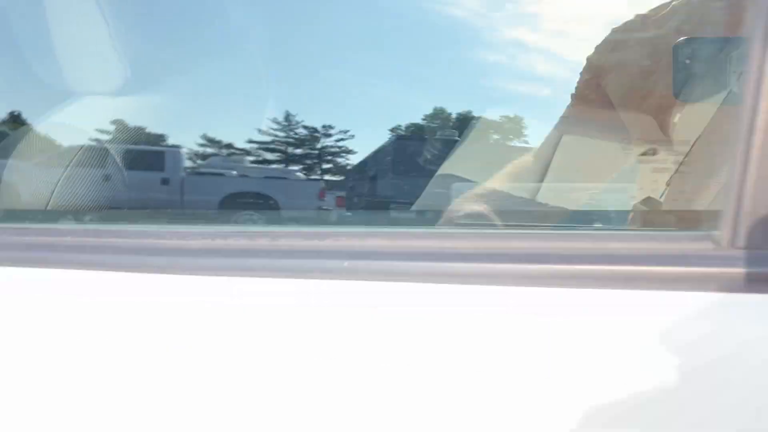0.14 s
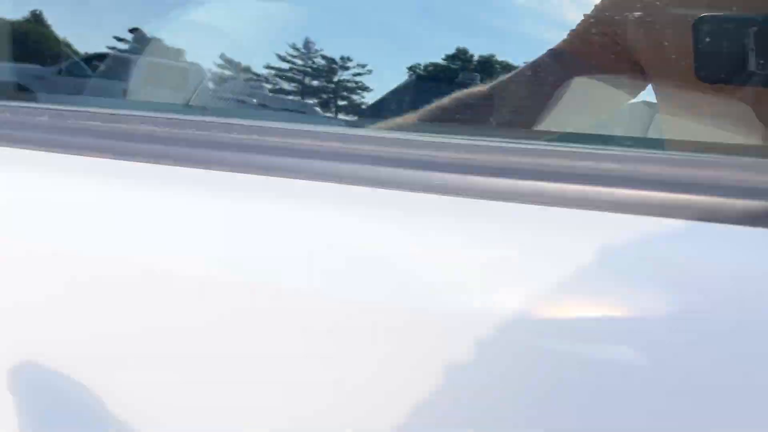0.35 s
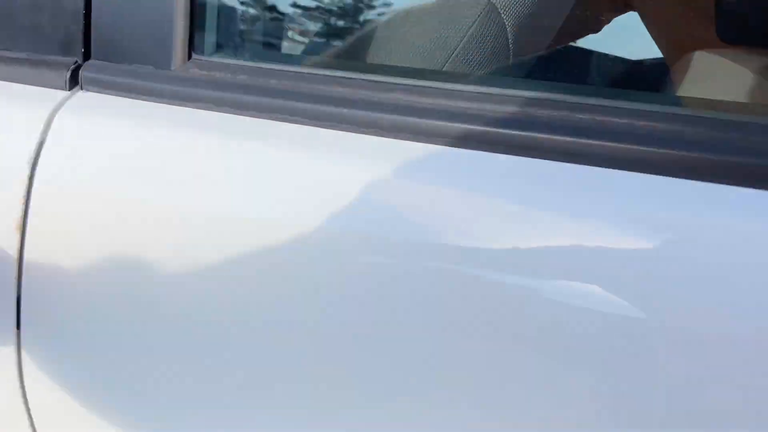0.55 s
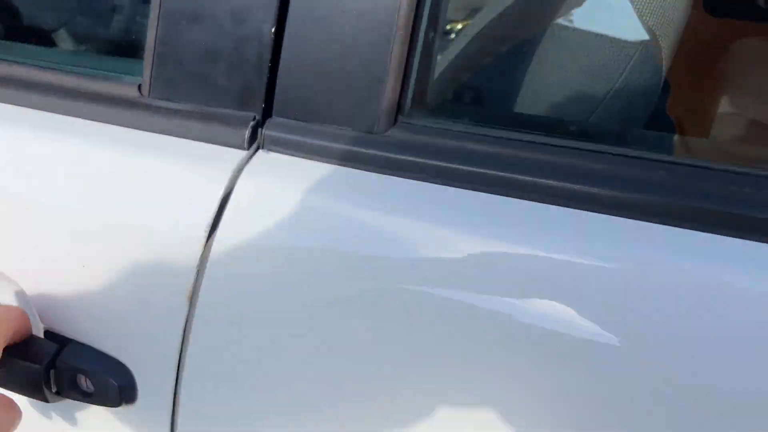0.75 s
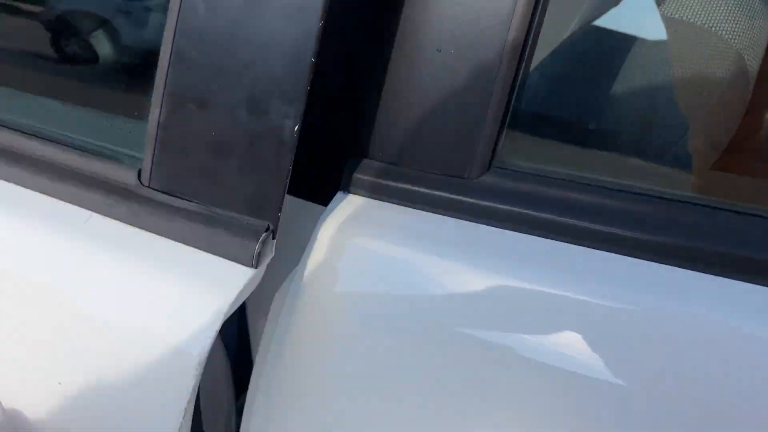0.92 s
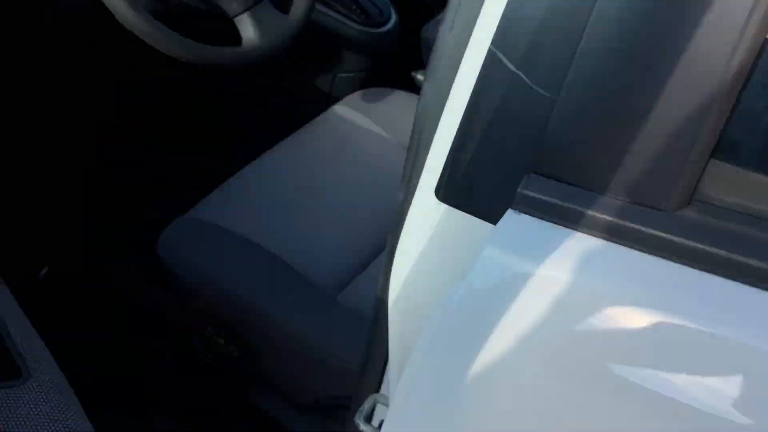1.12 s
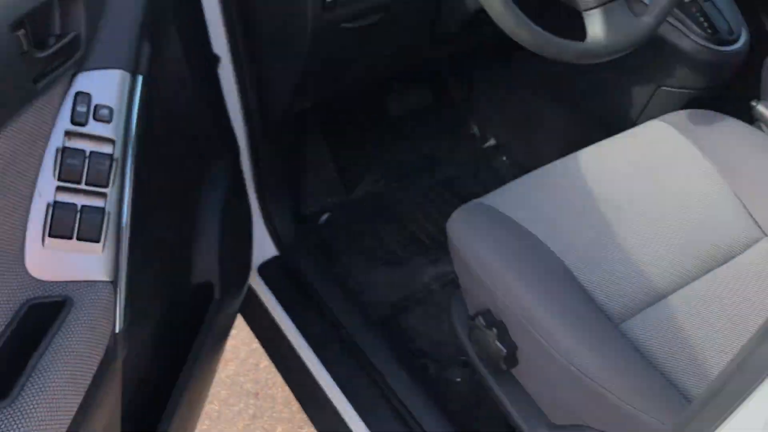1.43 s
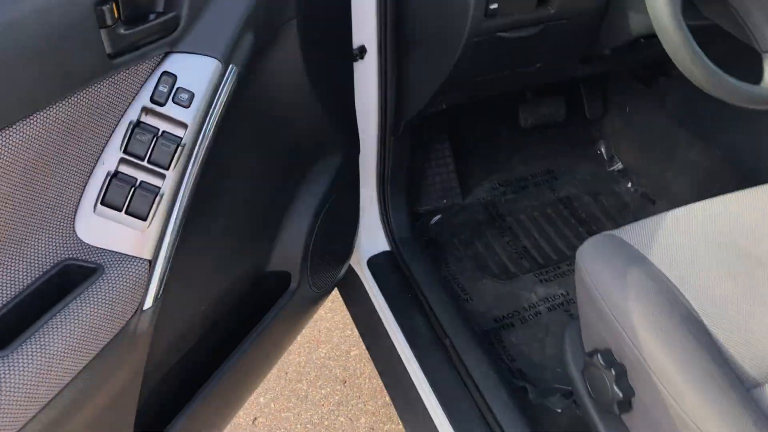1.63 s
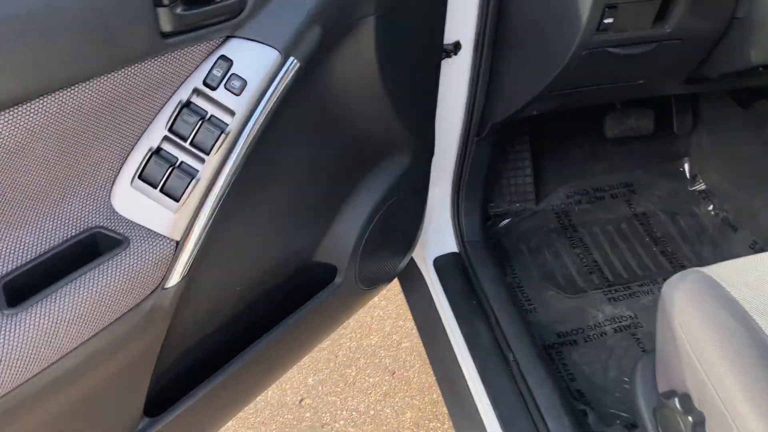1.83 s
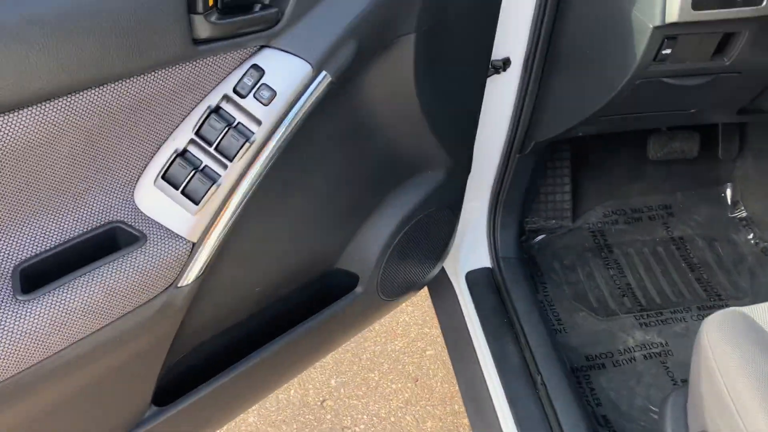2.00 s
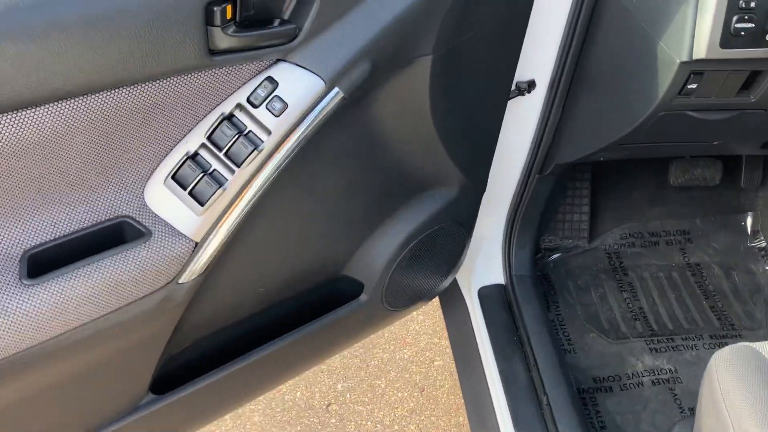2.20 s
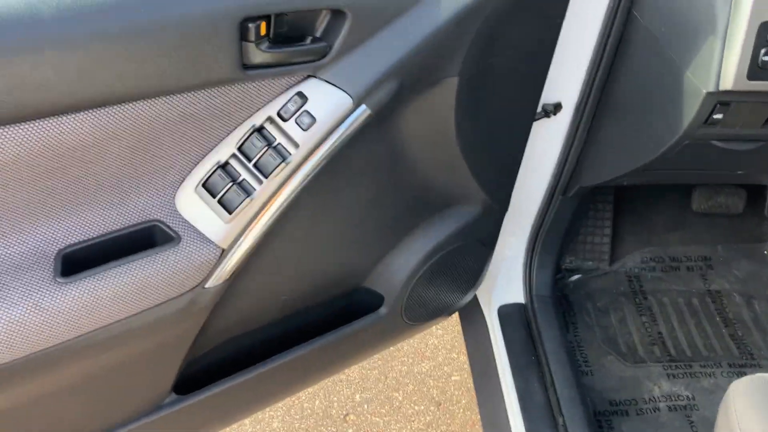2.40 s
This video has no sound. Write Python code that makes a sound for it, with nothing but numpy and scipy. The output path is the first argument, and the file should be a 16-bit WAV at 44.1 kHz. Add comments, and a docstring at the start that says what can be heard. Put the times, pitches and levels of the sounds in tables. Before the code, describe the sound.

A car door slams with a heavy hollow thump, then another door unlatches and swings open

```python
"""On an open lot a car door slams close to a handheld camera; a hand works the next door's handle, its latch
lets go with a clack and the door swings to its stop. Blows are sagging hollow modes; clatter is gritty noise
shaped by the colour of metal. Air stirred by the doors and the moving camera buffets the microphone as lumpy
low noise; far traffic, a smooth filtered wash, and insects, thin wavering tones, lie beneath."""
import sys
import numpy as np
from scipy.fft import rfft, irfft, next_fast_len
from scipy.io import wavfile
from scipy.ndimage import map_coordinates

SR = 44100
rng = np.random.default_rng(int(sys.argv[2]) if len(sys.argv) > 2 else 0)


def put_to_file(sound):
    """Save the sound as 16-bit audio at rate SR, in the file named by the first command-line argument."""
    columns = np.atleast_2d(sound).T  # one column per channel
    safe = np.clip(columns, -1, 1)
    whole_steps = np.round(safe * 32767)
    wavfile.write(sys.argv[1], SR, whole_steps.astype(np.int16))


N = 112454  # samples in the scene

# Lead of the left microphone port over the right as the camera turns: time_s, lead_ms
PORT_LEAD = [(.3, -0.13), (.8, 0.1676), (1.5, 0.467)]


def amp(db):
    """Linear gain of a level in dB."""
    return 10 ** (np.asarray(db) / 20)


def unit(x):
    """The signal scaled to rms 1."""
    return x / np.sqrt(np.mean(x ** 2) + 1e-20)


def along(points, hz):
    """Read a curve of (Hz, value) points on a log frequency axis."""
    f, v = np.transpose(points)
    return np.interp(np.log(hz + 1), np.log(f + 1), v)


def over_time(points, seconds):
    """Read a curve of (s, value) points on a linear time axis."""
    return np.interp(seconds, *np.transpose(points))


def random_curve(places):
    """A smooth random curve with one random knot at each whole number, read at rising places from 0."""
    knots = rng.standard_normal(int(len(places) * places[1]) + 4)
    return map_coordinates(knots, [places])


def wobble(rate):
    """A smooth random curve as long as the scene, with rate knots a second."""
    return random_curve(np.arange(N) * rate / SR)


def filtered(x, response):
    """Filter x by a complex response of frequency, with room for the tail."""
    m = next_fast_len(x.shape[-1] + 8192)
    spectrum = rfft(x, m) * response(np.fft.rfftfreq(m, 1 / SR))
    return irfft(spectrum, m)[..., :x.shape[-1]]


def pair(mid, side, apart_db):
    """Left and right ports from a shared part and an opposed part."""
    opposed = amp(apart_db) * side
    return np.array([mid + opposed, mid - opposed])


def thuds():
    """Each blow swells in a hollow mode and a faster-dying upper one, sags in pitch and dies."""
    # Hollow thuds of door panel, body and the handled camera, and low puffs of air on the microphone: #
    # start_s, level_db (main mode), pitch_hz (once settled), rise_s, t60_s
    blows = [(0.127, -6, 321, 0.0038, 0.021), (0.14, -9.5, 440.4, 0.0097, 0.093),
             (.156, -3, 55.8, 0.0037, 0.19), (0.248, -12.5, 166, 0.0011, 0.03),
             (.349, -17, 194, 0.0055, 0.16), (0.477, -10.5, 101, 0.012, 0.053),
             (0.521, -11.5, 129, 0.0087, 0.021), (.421, -5.5, 169.3, 0.0073, 0.083),
             (.655, -35, 334, 0.012, 0.04), (0.808, -8.5, 206, 0.0012, 0.055),
             (0.836, -15, 158.9, 0.0018, 0.25), (1.09, -18, 226.6, 0.014, 0.062),
             (1.142, -13.5, 114, 0.0037, 0.031), (1.19, -1, 223.8, 0.011, 0.032),
             (1.2077, -9.5, 228.6, 0.0129, 0.0082), (1.272, -15, 171, 0.0031, 0.035),
             (1.42, -19.5, 302, 0.0042, 0.044), (1.238, -11.5, 257.6, 0.0098, 0.14),
             (1.322, -25, 428, 0.0052, 0.033), (1.369, -18, 411, 0.005, 0.068),
             (1.388, -18, 368, 0.005, 0.027), (1.444, -18, 415, 0.0029, 0.034),
             (1.482, -24.5, 409, 0.004, 0.082), (1.954, -33, 89.6, 0.0027, 0.16),
             (2.28, -29, 76, 0.0033, 0.079), (2.274, -26.5, 244, 0.0029, 0.009),
             (2.436, -31, 80.4, 0.0032, 0.12)]
    sag, sag_s = 0.36, 0.0039  # share by which the pitch starts sharp, time constant of its fall
    upper_ratio, upper_db = 1.608, -12.5  # upper mode against the main one
    out = np.zeros((2, N + SR))
    t = np.arange(SR // 2) / SR
    sagging_phase = 2 * np.pi * (t + sag * sag_s * (1 - np.exp(-t / sag_s)))
    for s, db, hz, rise, t60 in blows:
        swell = np.sin(np.pi / 2 * np.clip(t / rise, 0, 1))
        fall = amp(-60 * np.maximum(t - rise, 0) / t60)
        main = np.sin(hz * sagging_phase)
        upper = amp(upper_db) * fall * np.sin(upper_ratio * hz * sagging_phase)
        blow = amp(db) * swell * fall * (main + upper)
        half_lead_s = over_time(PORT_LEAD, s) / 2000  # ms to s, halved
        for port, at in zip(out, (s - half_lead_s, s + half_lead_s)):
            port[round(at * SR):][:len(t)] += blow
    return out[:, :N]


def clatter():
    """Dense small contacts rise, hold and decay, each burst ringing one part; sharp clicks stand on top."""
    # Latch, handle and seal bursts, levels before grit and envelope:
    # start_s, level_db, rise_s, hold_s, t60_s, tilt_db_per_octave, ring_hz
    bursts = [(0.1238, -25, 0.00092, 0.0041, 0.19, -4, 1300),
              (0.1391, -14.5, 0.00079, 0.0094, 0.11, -5.5, 2050),
              (0.139, -23, 0.00066, 0.0097, 0.09, -0.5, 3540),
              (0.165, -28.5, 0.0014, 0.0022, 0.23, -0.5, 3040), (0.204, -38, 0.0045, 0.021, 0.19, -2, 1360),
              (0.378, -54.5, .07, .1, 0.27, 1, 7670), (0.723, -40.5, 0.0019, .003, 0.19, -0.5, 1000),
              (0.762, -36, 0.004, 0.018, 0.12, 0, 1000), (0.804, -25.5, 0.0046, 0.0031, 0.2, -3.5, 1235),
              (0.814, -31, 0.024, 0.015, 0.058, -3.5, 4500), (0.887, -32.5, 0.0027, 0.0024, .13, -6, 1300),
              (0.985, -38, 0.011, 0.012, 0.051, -0.5, 2060), (1.012, -38, 0.0022, 0.02, 0.1, 0.5, 2090),
              (1.085, -40, .004, 0.021, 0.23, -1.5, 1560), (1.166, -22.5, 0.022, 0.0017, 0.074, -1.5, 3780),
              (1.1824, -13.5, 0.00035, 0.0074, 0.11, -1, 1273),
              (1.4303, -45, 0.0013, 0.008, 0.14, -1, 4030),
              (1.531, -34.5, 0.0017, 0.008, 0.035, -1.5, 1680),
              (1.53, -44.5, 0.005, 0.022, 0.061, 4.5, 4540), (1.245, -31.5, 0.0039, 0.03, .16, -10.5, 556),
              (1.8724, -47.5, .0003, .0005, 0.018, -3, 3000), ]
    # Single sharp clicks of the latch parts, levels before grit and decay: start_s, level_db
    clicks = [(0.479, -46), (.529, -46), (.727, -43.5), (0.777, -34), (0.804, -38.5), (0.8379, -29),
              (.9995, -37.5), (1.018, -32.5), (1.0249, -34.5), (1.034, -34), (1.068, -36), (1.084, -32.5),
              (1.092, -35), (1.098, -30), (1.1823, -11.5), (1.2232, -29.5), (1.535, -40)]
    # Relative colour of the metal parts: freq_hz, density_db_per_hz
    metal_colour = [(290, -18.5), (500, -2), (1320, -10), (1790, -9.5), (3650, -14), (7980, -20),
                    (9220, -38), (10700, -20), (12500, -29), (13600, -36), (15000, -29.5), (16000, -28.5)]
    pivot_hz = 2000  # the brightness tilt turns about this
    peak_db, peak_width = 9, .25  # strength of the ringing part, width as a share of its pitch
    click_t60_s, click_tilt_db = 0.025, 1  # tilt per octave

    def metal(f, tilt_db):
        octaves = np.log2(np.maximum(f, metal_colour[0][0]) / pivot_hz)
        return amp(along(metal_colour, f) + tilt_db * octaves)

    def ring(f, hz):
        damping = 1j * f * peak_width * hz
        return 1 + amp(peak_db) * damping / (hz * hz - f * f + damping)

    out, t = 0, np.arange(SR // 2) / SR
    for s, db, rise, hold, t60, tilt_db, hz in bursts:
        decay = amp(-60 * np.maximum(t - rise - hold, 0) / t60)
        shape = np.clip(t / rise, 0, 1) * decay
        out = out + contact(s, db, shape, lambda f: metal(f, tilt_db) * ring(f, hz))
    click_shape = amp(-60 * t[:SR // 20] / click_t60_s)
    for s, db in clicks:
        out = out + contact(s, db, click_shape, lambda f: metal(f, click_tilt_db))
    return out


def contact(s, db, shape, colour):
    """One burst of gritty noise with its own uneven resonances, reaching the ports with the camera's lead."""
    margin = 512  # samples of room before the burst
    grit_db, grit_per_s = 4, 450  # random level changes within the burst
    uneven_db, uneven_hz = 2.8, 200  # random bumps of the spectrum and their spacing
    apart_db = -8  # opposed part between the ports
    shape = np.pad(shape, (margin, 0))
    grit = amp(grit_db * random_curve(np.arange(len(shape)) * grit_per_s / SR))
    noise = rng.standard_normal((2, len(shape))) * grit
    lead_s = over_time(PORT_LEAD, s) / 1000
    bumps = rng.standard_normal(int(SR / 2 / uneven_hz) + 4)

    def ports(f):
        uneven = amp(uneven_db * map_coordinates(bumps, [f / uneven_hz]))
        shift = np.exp(1j * np.pi * np.outer([lead_s, -lead_s], f))  # half the lead on each port
        return colour(f) * uneven * shift

    gain = amp(db) / np.std(filtered(noise, colour))
    burst = gain * filtered(pair(*shape * noise, apart_db), ports)
    return np.pad(burst, ((0, 0), (round(s * SR) - margin, N)))[:, :N]


def air():
    """Lumpy turbulence at the microphone ports, low rumble and upper flutter, nearly the same on both."""
    # Low rumble and upper flutter of the air, levels before the lumps: time_s, level_db
    rumble_level, flutter_level = [(0, -21.5), (0.058, -45.5), (.16, -16), (.36, -22.5), (0.449, -15.5),
                                   (.55, -19.5), (.6, -34), (.66, -18.5), (.74, -35.5), (.86, -22),
                                   (0.959, -34), (1.03, -30), (1.2, -39), (1.279, -21), (1.36, -52.5),
                                   (1.409, -22.5), (1.519, -59), (1.56, -38.5), (1.91, -60), (2, -45.5),
                                   (2.55, -54)], [(0, -49.5), (0.109, -34), (0.152, -9.5), (0.231, -25),
                                                (.45, -28), (.55, -30), (.59, -57.5), (.66, -42),
                                                (.72, -43.5), (0.829, -23), (.96, -45.5), (1.165, -33.5),
                                                (1.25, -23.5), (1.36, -36), (1.41, -26), (1.52, -35),
                                                (1.74, -57), (2.55, -57.5)]
    # Relative colour of each: freq_hz, density_db_per_hz
    rumble_colour, flutter_colour = [(13, -37), (22, -6.5), (70, 3), (146, -7), (200, -14), (260, -19.5),
                                     (440, -120)], [(71, -10), (120, 0.5), (216, -4), (286, -8.5),
                                                     (339, -11), (931, -38), (1000, -53), (2200, -120)]
    lump_db, lumps_per_s = 2.5, 40  # uneven puffs
    apart_db = -9  # what differs between the ports
    t, out = np.arange(N) / SR, 0
    for colour, level in ((rumble_colour, rumble_level), (flutter_colour, flutter_level)):
        lumps_db = lump_db * wobble(lumps_per_s)
        puffs = rng.standard_normal((2, N)) * amp(lumps_db + over_time(level, t))
        gain = lambda hz: amp(along(colour, hz))
        norm = np.std(filtered(rng.standard_normal(N), gain))
        out = out + pair(*filtered(puffs, gain) / norm, apart_db)
    return out


def traffic():
    """Far traffic as a smooth wash of steady noise, less alike at the two ports as frequency rises."""
    # Relative colour of the far traffic: freq_hz, density_db_per_hz
    wash_colour = [(100, -33), (415, -10), (583, -10), (1100, -11.5), (1390, -11), (1720, -15.5),
                   (3780, -27.5), (8280, -31.5), (9340, -40.5), (11600, -35.5), (13500, -54.5),
                   (15300, -38.5)]
    # Likeness of left and right: freq_hz, correlation
    alike = [(100, 0.79), (900, 0.063)]
    wash_db = -55  # rms over both ports

    def mid_and_side(hz):
        turn = np.arccos(np.clip(along(alike, hz), -1, 1)) / 2
        gain = amp(along(wash_colour, hz)) * (hz > 250)
        return gain * [np.cos(turn), np.sin(turn)]

    mid, side = filtered(rng.standard_normal((2, N)), mid_and_side)
    return amp(wash_db) * unit(pair(mid, side, 0))


def insects():
    """Many thin tones, each swelling and wavering by itself at each port."""
    # Level of a chorus tone before its own swelling: time_s, level_db
    tone_level = [(0, -77), (.6, -77.5), (1.3, -82), (2.5, -77)]
    # Single insects: pitch_hz, level_db (over a chorus tone)
    soloists = [(5640, -1), (7590, 7)]
    voices_n, centre_hz, spread_hz = 22, 7400, 600  # the chorus
    waver_db, waver_rad = 5, 1.6  # depth of swelling and of phase wander
    t = np.arange(N) / SR
    pitches = np.clip(rng.normal(centre_hz, spread_hz, voices_n), 6450, 8600)
    voices = [(hz, 0) for hz in pitches] + list(soloists)
    tones = np.zeros((2, N))
    for port in tones:
        for hz, db in voices:
            swelling = amp(db + waver_db * wobble(5.04))
            port += swelling * np.sin(2 * np.pi * hz * t + waver_rad * wobble(5.3))
    return amp(over_time(tone_level, t)) * tones


def scene():
    """Doors, stirred air and the far lot together at the two microphone ports."""
    return thuds() + clatter() + air() + traffic() + insects()


def record(dry):
    """The camera's input loses the lowest bass, rounds off the peaks and keeps nothing above its band limit."""
    low_hz, top_hz = 25, 16300  # corner of the bass loss, band limit
    ceiling = .97  # full scale is 1
    band = lambda hz: (hz < top_hz) * (1j * hz / (low_hz + 1j * hz)) ** 2
    heard = filtered(dry, band)
    rounded = heard / (1 + abs(heard / ceiling) ** 6) ** (1 / 6)
    return filtered(rounded, lambda hz: hz < top_hz)


dry = scene()
out = record(dry)
put_to_file(out)
```